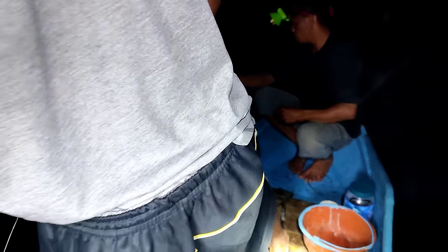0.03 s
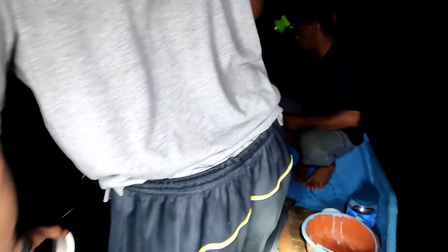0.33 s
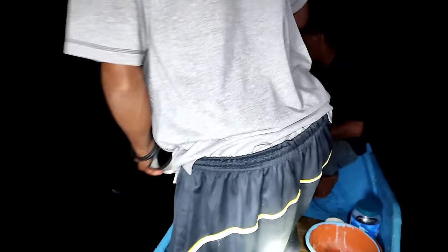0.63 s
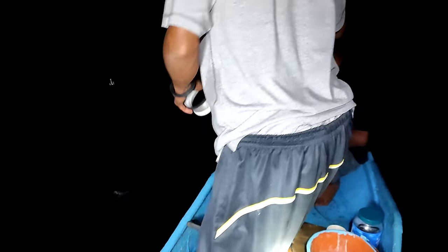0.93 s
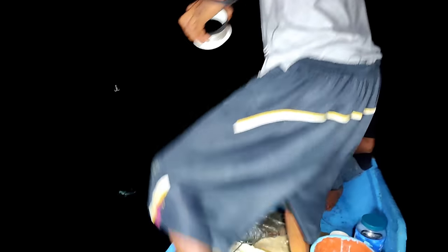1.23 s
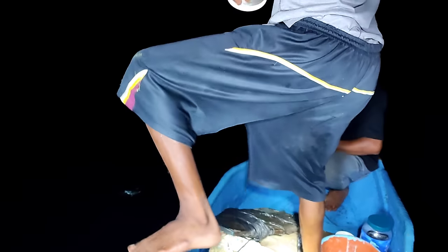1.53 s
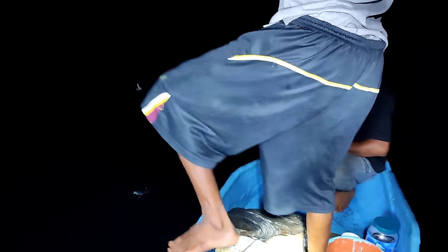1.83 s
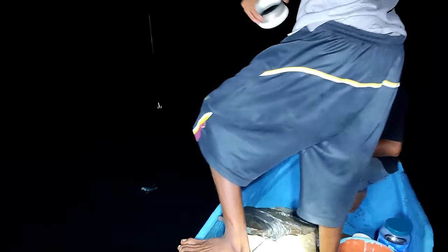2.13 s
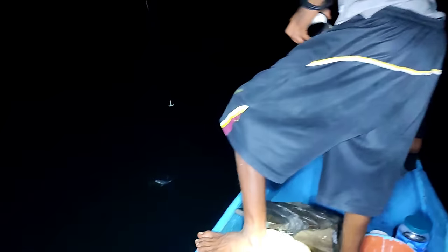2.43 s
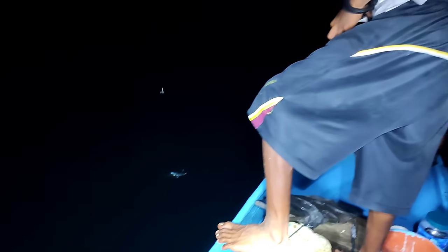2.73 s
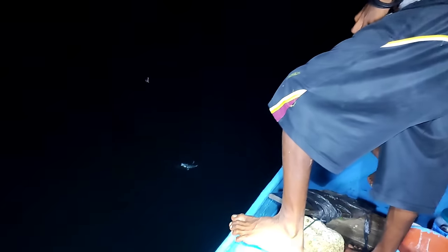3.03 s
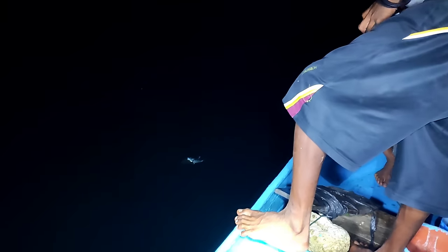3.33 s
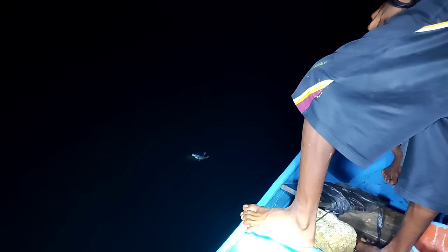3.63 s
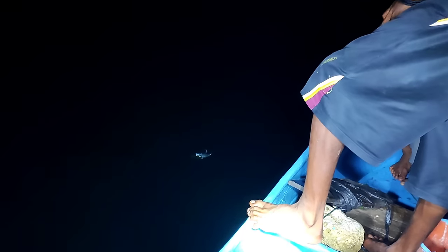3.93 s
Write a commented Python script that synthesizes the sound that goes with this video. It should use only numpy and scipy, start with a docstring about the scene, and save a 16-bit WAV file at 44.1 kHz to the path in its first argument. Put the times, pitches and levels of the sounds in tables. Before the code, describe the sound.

Bare feet thump on a small boat's deck, rattling loose boards over faint lapping water.

```python
"""A small boat's hull rumbles low on quiet water at night; the lapping traps small ringing bubbles.
Behind it lie a faint hiss, a far insect chorus and a few very high chirps.
Close by, soles scuff and clothes rustle by friction, and bare feet take three steps on the deck:
each impact excites the low modes of the hull and rings and rattles the loose boards."""
import sys
import numpy as np
from scipy import signal
from scipy.fft import rfft, irfft
from scipy.io import wavfile
from scipy.ndimage import uniform_filter1d

SR = 44100
rng = np.random.default_rng(int(sys.argv[2]) if len(sys.argv) > 2 else 0)


def wrap_up_sound(samples):
    """Save the sound to the file named by the first command line argument, as 16-bit audio."""
    columns = np.atleast_2d(samples).T
    # keep every value between -1 and 1, then stretch to whole-number steps
    tamed = np.clip(columns, -1, 1)
    steps = np.round(tamed * 32767).astype(np.int16)
    wavfile.write(sys.argv[1], SR, steps)


N = 176400

# left-right coherence, chiefly of the surroundings: f/Hz, coherence/1
AIR_COHERENCE = [(50, 0.96), (250, 0.92), (600, 0.8), (2000, 0.22), (5000, 0.11), (14000, 0.17)]
# left-right coherence, chiefly of sounds on the deck: f/Hz, coherence/1
DECK_COHERENCE = [(50, .99), (400, 0.89), (1000, 0.75), (2000, 0.22), (4000, 0.1), (14000, 0.097)]
# swell of the lapping water: t/s, level/dB
WASH_LEVEL = [(0, -69.5), (.37, -71), (.62, -70.5), (.74, -63), (.92, -69.5), (1.1, -64), (1.45, -64.5),
              (1.75, -64.5), (2.12, -69), (2.35, -62), (2.55, -62.5), (2.8, -64), (3.1, -64), (3.45, -69),
              (3.75, -74), (4, -89)]
AIR_LAG_S, DECK_LAG_S = 0.000471, 0.00008  # delay of the left channel
WATER_BALANCE_DB = -2.5


def amp(db):
    """Amplitude ratio of a level in decibels."""
    return 10 ** (np.asarray(db) / 20)


def unit(x):
    """Normalisation to rms 1."""
    return x / np.sqrt(np.mean(x ** 2) + 1e-20)


def read(points, hz):
    """Interpolation on a log-frequency axis."""
    f, value = np.transpose(points)
    return np.interp(np.log(hz + 1), np.log(f + 1), value)


def add(mix, s, sound):
    """Superposition of a sound on the mix from time s."""
    part = mix[:, round(s * SR):][:, :sound.shape[-1]]
    part += sound[..., :part.shape[1]]


def pan(db):
    """Channel gains for a level difference, left minus right."""
    return amp(np.array([[db], [-db]]) / 2)


def bump(centre_hz, octaves):
    """A band spectrum whose energy per octave is Gaussian."""
    return lambda hz: np.exp(-.5 * (np.log2((hz + 1) / centre_hz) / octaves) ** 2) / np.sqrt(hz + 1)


def noise(size, colour, coherence, lag_s):
    """Partially coherent stereo noise of rms 1, the left channel delayed by lag_s."""
    hz = np.fft.rfftfreq(size, 1 / SR)
    common, separate = np.exp(2j * np.pi * rng.random((2, len(hz))))
    share = np.clip(read(coherence, hz), 0, 1)
    left = common * np.exp(-2j * np.pi * hz * lag_s)
    right = share * common + np.sqrt(1 - share ** 2) * separate
    return unit(irfft(np.array([left, right]) * colour(hz), size))


def drift(size, rate_hz):
    """Low-pass random fluctuation of rms 1."""
    hz = np.fft.rfftfreq(size, 1 / SR)
    return unit(irfft(rfft(rng.standard_normal(size)) * np.exp(-(hz / rate_hz) ** 2) * (hz > 0), size))


def ring(modes, t, lowpass):
    """Free vibration as a sum of damped modes; the channels' phases differ more for higher ones."""
    rad_per_hz = rng.standard_normal((len(modes), 2, 1)) * 0.00048
    return sum((-1) ** k * amp(db - 60 * t / t60) * lowpass(hz)
               * np.sin(2 * np.pi * hz * t + rad_per_hz[k] * hz)
               for k, (hz, db, t60) in enumerate(modes))


def hull_rumble():
    """Forced vibration of the hull on the water: low noise of slowly varying level."""
    # rumble spectrum: f/Hz, relative density/dB
    spectrum = [(10, -27.5), (24, -21), (33, -5.5), (46, 2.5), (62, -4), (85, -13.5), (130, -15),
                (200, -23.5), (262, -24), (340, -32.5), (600, -45), (2000, -57.5)]
    # rumble envelope: t/s, level/dB
    levels = [(0, -48.5), (.7, -48.5), (.9, -45.5), (1.1, -48.5), (1.5, -49.5), (2, -47), (2.3, -51),
              (2.6, -50), (2.851, -49.5), (3.08, -49), (3.4, -50), (4, -49.5)]
    rumble = noise(N, lambda hz: amp(read(spectrum, hz)), AIR_COHERENCE, DECK_LAG_S)
    return rumble * amp(np.interp(np.arange(N) / SR, *np.transpose(levels)))


def water_wash():
    """Modulated noise: a patchy wash swells as the boat rocks, and slowly brightens."""
    # wash spectrum: f/Hz, relative density/dB
    spectrum = [(150, -20), (480, 0.5), (800, -1.5), (1500, -2), (2200, -7.5), (3000, -13.5), (5000, -22),
                (12000, -32.5)]
    steady = noise(N, lambda hz: amp(read(spectrum, hz)), AIR_COHERENCE, AIR_LAG_S)
    hz, t, cells = signal.stft(steady, SR, nperseg=512)
    patches = uniform_filter1d(rng.standard_normal(cells.shape[1:]), size=4, axis=0)
    patch_db = 2 * unit(uniform_filter1d(patches, size=4, axis=1))
    octaves = np.log2(np.clip(hz, 400, 2400) / 1000)
    tilt_db = 0.76 * np.outer(octaves, t - t.mean())  # dB per octave, gained each second
    wash = unit(signal.istft(cells * amp(patch_db + tilt_db))[1][:, :N])
    return wash * pan(WATER_BALANCE_DB) * amp(np.interp(np.arange(N) / SR, *np.transpose(WASH_LEVEL)))


def bubbles():
    """Resonance of trapped air: each bubble rings briefly, rising in pitch, louder as the wash swells."""
    per_s, low_hz, high_hz = 60, 430, 2440
    cycles, rise = 6.4, 0.038  # periods and relative pitch rise in one decay time
    out, t = np.zeros((2, N)), np.arange(2 ** 12) / SR
    for when, pitch, strength, side in rng.random((round(per_s * N / SR), 4)):
        s, hz = when * N / SR, low_hz * (high_hz / low_hz) ** pitch
        lag_s = np.array([[AIR_LAG_S * 2 * side], [0]])
        age = np.maximum(t - lag_s, 0) * hz / cycles  # in decay times
        excess_db = 2 + 2.5 * min(-np.log(1 - strength), 2)
        db = np.interp(s, *np.transpose(WASH_LEVEL)) + excess_db
        envelope = (1 - np.exp(-10 * age)) * np.exp(-age)
        add(out, s, amp(db) * envelope * np.sin(2 * np.pi * cycles * age * (1 + rise * age / 2)))
    return out * pan(WATER_BALANCE_DB)


def night_hiss():
    """Stationary broadband noise, heard as a faint hiss."""
    # hiss spectrum: f/Hz, relative density/dB
    spectrum = [(200, 1), (600, 0.5), (1200, -3), (1900, -4.5), (3000, -8), (5500, -12.5), (8500, -20),
                (11000, -38), (14000, -17.5)]
    return amp(-70.5) * pan(-2) * noise(N, lambda hz: amp(read(spectrum, hz)), AIR_COHERENCE, AIR_LAG_S)


def insect_chorus():
    """Incoherent summation: far insects merge into a narrow noise band whose level flutters."""
    band = noise(N, bump(centre_hz=7240, octaves=0.092), DECK_COHERENCE, lag_s=0)
    return band * amp(-79.5 + drift(N, rate_hz=67))


def scuffs():
    """Sliding friction: grainy noise swells and fades with each slide; a soft sole is duller than cloth."""
    # slides of soles and cloth: t/s, duration/s, level/dB, left minus right/dB, cutoff f/Hz
    slides = [(0.364, 0.039, -60, 0, 700), (0.381, 0.13, -65, 0, 14000), (0.551, .11, -61, -1, 460),
              (0.631, 0.032, -69.5, -5, 14000), (0.944, 0.1, -56, 0.5, 750), (1.188, 0.11, -59, -2, 7360),
              (1.323, 0.025, -59, -1, 13800), (1.342, 0.034, -59.5, -2, 13800),
              (1.54, 0.13, -57.5, -2.5, 14300), (1.568, 0.025, -53.5, -1, 14000),
              (1.677, 0.13, -65.5, -3, 14000), (1.742, 0.11, -55.5, 0.5, 654),
              (1.819, 0.02, -54, -3.5, 13500), (1.828, 0.057, -60, -1, 14000),
              (1.882, 0.018, -59, -3, 14000)]
    # friction spectrum: f/Hz, relative density/dB
    spectrum = [(300, 5), (1500, 8.5), (3500, 3.5), (5500, -0.5), (8000, 2.5), (10000, -3.5), (14000, 1.5)]
    out, t = np.zeros((2, N)), np.arange(2 ** 13) / SR
    for s, length_s, db, side_db, cutoff_hz in slides:
        colour = lambda hz: amp(read(spectrum, hz)) / (1 + (hz / cutoff_hz) ** 3)
        rub = noise(len(t), colour, DECK_COHERENCE, DECK_LAG_S)
        grains = unit(rub * amp(drift(len(t), rate_hz=720)))  # 1 dB rms of roughness
        add(out, s, amp(db) * pan(side_db) * grains * np.sin(np.pi * np.minimum(t / length_s, 1)))
    return out


def ticks():
    """Transients: drips and snaps of cloth and gear are short bursts of band noise."""
    # bursts: t/s, level/dB, centre f/Hz, width/octaves, decay time/s
    bursts = [(0.399, -58, 9000, 1.6, 0.0023), (0.414, -59.5, 9000, 1, 0.0042),
              (.439, -52.5, 5000, 1.9, 0.0023), (0.462, -57.5, 5500, 1, 0.0015),
              (.491, -59, 8000, 0.76, 0.0013), (1.2306, -51, 2600, 0.37, 0.005),
              (1.502, -56.5, 2090, 0.16, 0.0071), (1.827, -55, 2290, 0.032, 0.0039),
              (2.511, -49.5, 468, 0.14, 0.014), (2.518, -59, 1560, 0.14, 0.007),
              (2.546, -58, 1050, 0.12, 0.0081), (2.878, -52.5, 2100, 0.27, 0.0038),
              (3.043, -54.5, 1900, 1.7, 0.0023), (3.3728, -50.5, 1880, 0.98, 0.0027)]
    out, t = np.zeros((2, N)), np.arange(2 ** 12) / SR
    for s, db, hz, octaves, decay_s in bursts:
        envelope = np.sqrt(2 * t / decay_s) * np.exp(.5 - t / decay_s)
        add(out, s, amp(db) * envelope * noise(len(t), bump(hz, octaves), AIR_COHERENCE, AIR_LAG_S))
    return out * pan(-4)


def chirps():
    """Linear frequency sweeps: each very high chirp is a short falling tone."""
    # chirps: t/s, starting f/Hz, left level/dB, right level/dB
    calls = [(0.62, 13200, -79, -68), (0.897, 13250, -83, -68.5), (2.08, 12850, -75, -79),
             (2.886, 12800, -76, -85), (3.903, 13300, -73, -86)]
    length_s, fall_hz_per_s = 0.052, 13000
    out, t = np.zeros((2, N)), np.arange(0, length_s, 1 / SR)
    envelope = np.sin(np.pi * np.sqrt(t / length_s)) ** 2
    for s, hz, left_db, right_db in calls:
        tone = np.sqrt(2) * np.sin(2 * np.pi * (hz - fall_hz_per_s * t / 2) * t)
        add(out, s, amp([[left_db], [right_db]]) * envelope * tone)
    return out


def steps():
    """Impact excitation: each blow rings the hull and rattles the boards; a planted foot damps the boards."""
    # foot blows and board knocks: t/s, hull level/dB, board level/dB, clatter level/dB,
    # cutoff f/Hz, rise time/s, struck spot f/Hz, factor on the boards' T60/1
    blows = [(1.04, -43.5, -65, -56.5, 900, 0.0027, 300, 0.54),
             (1.2303, -36.5, -38, -41, 2700, 0.00067, 415, 0.72),
             (1.236, -76, -37, -40, 1650, 0.0013, 1060, 1), (1.249, -39, -57, -38, 2000, 0.0011, 804, 0.8),
             (1.2631, -59, -33.5, -39, 1000, 0.0044, 820, 0.93),
             (1.271, -62, -47, -35.5, 1300, 0.002, 458, 0.87),
             (1.295, -49, -52, -43, 1400, 0.0028, 1115, 0.86),
             (1.329, -50.5, -61.5, -44.5, 1600, 0.0041, 433, 1),
             (1.355, -47.5, -53, -45, 2000, 0.0052, 336, 1),
             (1.55, -52, -57, -46.5, 900, 0.0078, 600, 0.61),
             (1.561, -49, -42, -38.5, 1260, 0.008, 516, 0.54),
             (1.579, -34, -51, -39, 1000, 0.0043, 192, 0.67),
             (1.593, -35, -47.5, -41.5, 550, 0.0022, 248, 0.74),
             (1.616, -39, -49, -42, 1200, 0.0034, 644, 0.96),
             (1.83, -37.5, -41, -44, 1760, 0.0017, 1602, 0.5),
             (1.844, -39, -46, -37.5, 1300, 0.0013, 950, 0.59),
             (1.851, -38.5, -41.5, -40.5, 970, 0.0017, 505, 0.68),
             (1.882, -36.5, -58, -63, 352, 0.0047, 170, 0.38),
             (1.908, -43, -51, -53, 500, 0.0028, 235, 0.33),
             (2.014, -68, -58.5, -69, 577, 0.0033, 269, 0.62),
             (2.362, -51.5, -64, -55.5, 1000, 0.0063, 630, 0.73),
             (2.755, -54, -60, -60.5, 786, 0.0056, 483, 0.66),
             (3.372, -74, -65, -59, 1500, 0.0011, 515, 0.44)]
    # hull modes: f/Hz, relative level/dB, T60/s
    hull_modes = [(70.5, -7, 0.37), (112.1, 5.5, 0.13), (131.1, -0.5, 0.128), (169.6, -7, 0.18)]
    # deck board modes: f/Hz
    board_hz = [268, 312, 439, 485, 508, 598, 678, 744, 801, 950, 1035, 1127, 1450, 1537, 1778, 1916, 2317]
    # the same modes: relative level/dB, free T60/s
    board_decays = [(2.5, 0.19), (-1.5, 0.18), (-11, 0.23), (-6.5, 0.17), (-5.5, 0.095), (-32, 0.061),
                    (-18, 0.39), (-13.5, 0.2), (-8, 0.16), (-44, 0.092), (-18, 0.24), (-8, 0.14),
                    (-21, 0.086), (-21, 0.22), (-16, .13), (-15.5, 0.12), (-16, 0.25)]
    # rattle spectrum of loose boards: f/Hz, relative density/dB
    spectrum = [(40, 2), (150, 4.5), (280, 10.5), (480, 0.5), (600, -1), (800, 4), (1120, -4.5), (1350, -7),
                (2000, -8.5), (3000, -20), (6000, -32), (14000, -20)]
    rattle_decay_s, tail_db, tail_decay_s = 0.014, -29.5, 0.034
    spot_db, spot_t60_s = 1, 0.073
    out, t = np.zeros((2, N)), np.arange(SR // 3) / SR
    for s, hull_db, board_db, clatter_db, cutoff_hz, rise_s, spot_hz, t60_factor in blows:
        lowpass = lambda hz: 1 / np.sqrt(1 + (hz / cutoff_hz) ** 4)
        rattle = noise(len(t), lambda hz: amp(read(spectrum, hz)) * lowpass(hz), DECK_COHERENCE, DECK_LAG_S)
        fade = np.exp(-np.maximum(t - rise_s, 0) / rattle_decay_s)
        tail = amp(tail_db) * np.exp(-t / tail_decay_s)
        spot = ring([(spot_hz, spot_db, spot_t60_s)], t, lowpass)
        clatter = amp(clatter_db) * (rattle * (fade + tail) + spot)
        thud = amp(hull_db) * ring(hull_modes, t, lowpass)
        board_modes = [(hz, db, t60 * t60_factor) for hz, (db, t60) in zip(board_hz, board_decays)]
        boards = amp(board_db) * ring(board_modes, t, lowpass)
        add(out, s, (thud + boards + clatter) * np.minimum(t / rise_s, 1))
    return out * pan(-0.5)


def scene():
    """Superposition of the sounds on deck, the water and the night."""
    deck = steps() + scuffs() + ticks()
    water = hull_rumble() + water_wash() + bubbles()
    night = night_hiss() + insect_chorus() + chirps()
    return deck + water + night


def record(dry):
    """Band limiting by a linear-phase low-pass filter."""
    cutoff_hz = 14350
    lowpass = signal.firwin(511, cutoff_hz, window=("kaiser", 9), fs=SR)
    return signal.oaconvolve(dry, lowpass[None], "same")


dry = scene()
out = record(dry)
wrap_up_sound(out)
```